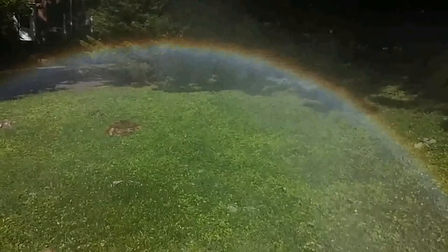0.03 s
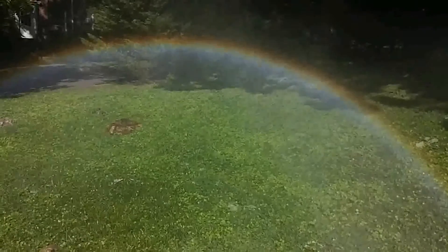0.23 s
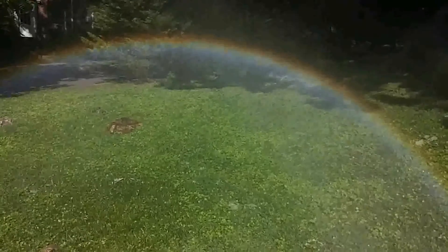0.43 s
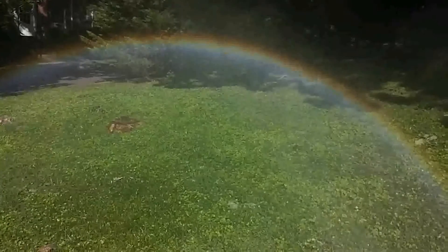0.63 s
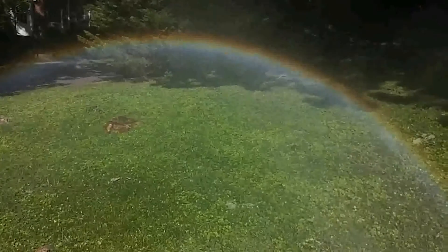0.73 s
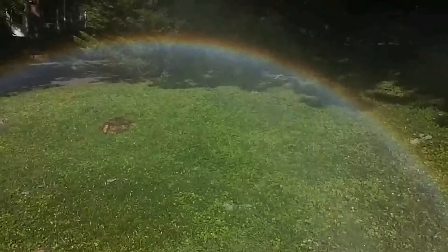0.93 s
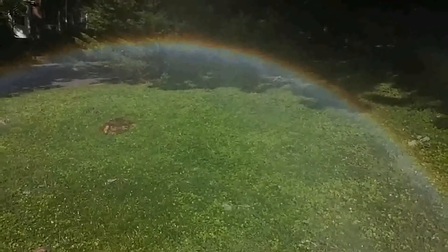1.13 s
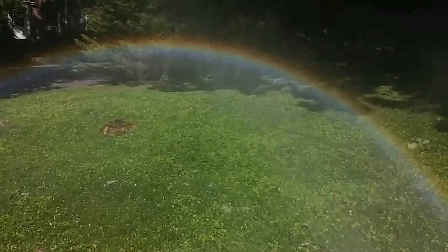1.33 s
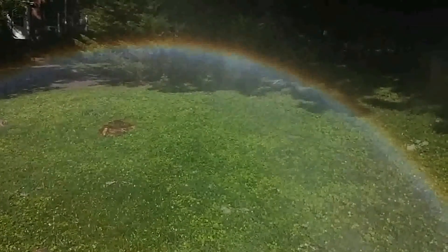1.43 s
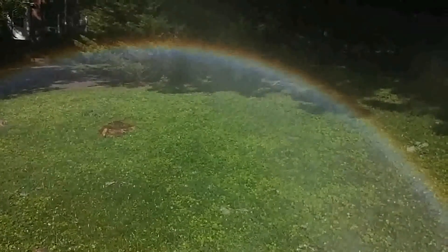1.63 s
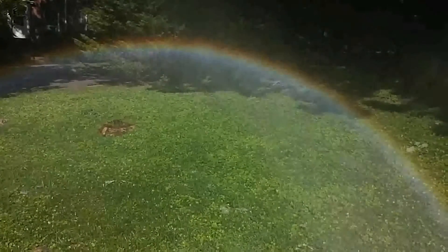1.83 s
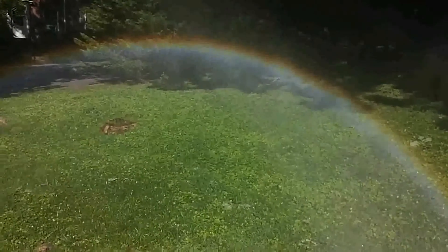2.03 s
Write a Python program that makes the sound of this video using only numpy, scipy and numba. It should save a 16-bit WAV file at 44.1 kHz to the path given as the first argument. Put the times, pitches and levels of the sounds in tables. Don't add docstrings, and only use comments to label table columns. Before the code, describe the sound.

Continuous close spray from a garden sprinkler, airy and bright, with a wavering mid-high gurgle, soft patter and tiny bubbles on turf. Faint distant traffic and yard air; phone stereo, left duller than right.

```python
import sys
import numpy as np
from scipy import signal
from scipy.fft import rfft, irfft
from scipy.io import wavfile
from scipy.ndimage import uniform_filter1d, map_coordinates
from numba import njit

SR = 44100
rng = np.random.default_rng(int(sys.argv[2]) if len(sys.argv) > 2 else 0)


def gain_from_decibels(decibels):
    exponent = np.asarray(decibels, float) / 20
    return 10 ** exponent


def unload_audio(sound):
    columns = np.transpose(np.atleast_2d(sound))
    steps = np.round(np.clip(columns, -1, 1) * 32767)
    wavfile.write(sys.argv[1], SR, steps.astype(np.int16))


N = 91860


def unit(x):
    return x / np.sqrt(np.mean(x ** 2))


def on_hz(table, hz):
    table = np.array(table)
    return np.interp(np.log(hz + 1), np.log(table[:, 0]), table[:, 1])


def on_time(table, column):
    table = np.array(table)
    return np.interp(np.arange(N) / SR, table[:, 0], table[:, column])


def bump(hz, at_hz, wide_hz):
    return 1 / (1 + (2 * (hz - at_hz) / wide_hz) ** 2)


def walk(rate):
    hold = max(int(SR / rate), 2)
    steps = np.repeat(rng.standard_normal(N // hold + 1), hold)
    smooth = uniform_filter1d(uniform_filter1d(steps, hold), hold)
    return unit(smooth[:N])


def patchy(seed, colour, swell_db, shared_db, flicker_db, flicker_rate):
    hz = np.arange(N // 2 + 1) * SR / N
    spectrum = rfft(seed) * gain_from_decibels(on_hz(colour, hz))
    place = 3 * np.log2((hz + 1) / 20)
    out, swell, group = 0, walk(10.4), walk(29.3)
    for band in range(30):
        group = unit(group + walk(26.23))
        level_db = swell_db * swell + shared_db * group + flicker_db * walk(flicker_rate)
        mask = np.cos(np.pi / 2 * np.clip(place - band, -1, 1)) ** 2
        out = out + gain_from_decibels(level_db) * irfft(spectrum * mask, N)
    return unit(out)


def drops():
    drops_per_s, spread_db, share = 5000, 1.5, .3
    hit = rng.random((2, N)) < drops_per_s / SR
    size = gain_from_decibels(spread_db * rng.exponential(size=(2, N))) * rng.standard_normal((2, N))
    bed = rng.standard_normal((2, N))
    return np.sqrt(share) * unit(hit * size) + np.sqrt(1 - share) * bed


# time in seconds, jet level in dB, splash level in dB.
WATER_FLOW = [(0.0, -37, -48), (0.05, -35.5, -44), (0.22, -36, -45), (1.31, -37.5, -43), (1.33, -36, -44.5),
              (1.45, -37.5, -39.5), (1.49, -36.5, -44), (1.64, -36, -41), (1.68, -36.5, -42),
              (1.7, -37, -37.5), (1.72, -35, -43), (1.75, -36, -40), (2.02, -37, -39.5), (2.08, -36, -39)]
# frequency in Hz, strength in dB per Hz.
JET_COLOUR = [(300, -30), (2000, -12), (4000, -3), (5000, -.5), (6500, -.5), (8000, .5), (9400, 0),
              (16000, 0)]


def jet():
    hiss = patchy(drops(), JET_COLOUR, swell_db=0.24, shared_db=0.43, flicker_db=.5, flicker_rate=15)
    return gain_from_decibels(on_time(WATER_FLOW, 1) - 1) * hiss


@njit
def plink(start, hz, size, cycles, n):
    y = np.zeros(n)
    for k in range(len(start)):
        length = int(3 * cycles * SR / hz[k])
        for i in range(min(length, n - start[k])):
            turns = i * hz[k] / SR
            swell = turns * np.exp(-3 * turns / cycles)
            y[start[k] + i] += size[k] * swell * np.sin(2 * np.pi * turns * (1 + .02 * turns / cycles))
    return y


# frequency in Hz, strength in dB per Hz.
SPLASH_COLOUR = [(300, -41), (750, -25.5), (1050, -12.5), (1900, -9), (3200, -5), (4000, -7.5), (5000, -18),
                 (8000, -43)]


def bubbles():
    bubbles_per_s, low_hz, high_hz, cycles = 900, 900, 5500, 24.
    ports = []
    for _ in range(2):
        when, pitch, size = rng.random((int(bubbles_per_s * N / SR), 3)).T
        hz = low_hz * (high_hz / low_hz) ** pitch
        loudness = gain_from_decibels(on_hz(SPLASH_COLOUR, hz) + 14.7 * size ** 3) * hz
        ports.append(plink((when * N).astype(np.int64), hz, loudness, cycles, N))
    return unit(np.array(ports))


def splash():
    patter = patchy(drops(), SPLASH_COLOUR, swell_db=.3, shared_db=.3, flicker_db=1.2, flicker_rate=50)
    return gain_from_decibels(on_time(WATER_FLOW, 2) + 1.0) * (patter + gain_from_decibels(-4) * bubbles())


@njit
def moving_band(x, hz, width):
    y, band, low = np.empty(len(x)), 0., 0.
    for i in range(len(x)):
        g, damping = np.tan(np.pi * hz[i] / SR), width / hz[i]
        v = (band + g * (x[i] - low)) / (1 + g * (g + damping))
        band, low, y[i] = 2 * v - band, low + 2 * g * v, damping * v
    return y


# time in seconds, level in dB, pitch in Hz.
THROAT_RING = [(0.0, -42, 2470), (0.03, -40.5, 2500), (0.11, -41.5, 2210), (0.23, -39, 2480),
               (0.4, -43.5, 2370), (0.45, -39.5, 2100), (0.54, -43, 2390), (0.56, -36.5, 2470),
               (0.62, -40, 2390), (0.83, -45.5, 2370), (0.94, -41, 2450), (1.36, -45.5, 2400),
               (1.39, -38, 2400), (1.47, -41, 2490), (1.85, -39.5, 2340), (1.96, -41, 2380),
               (1.98, -36.5, 2440), (2.08, -40.5, 2440)]


def throat():
    width_hz = 1.5 * 290
    hz = on_time(THROAT_RING, 2) * (1 + 0.012 * walk(39.9))
    gulps = gain_from_decibels(.6 * walk(60))
    ports = []
    for _ in range(2):
        flow = gulps * rng.standard_normal(N)
        ports.append(moving_band(moving_band(flow, hz, width_hz), hz, width_hz))
    return gain_from_decibels(on_time(THROAT_RING, 1) + 0.1) * unit(np.array(ports))


# time in seconds, rumble level in dB.
TRAFFIC_LEVEL = [(0.0, -51.5), (0.06, -58.5), (0.08, -46.5), (0.35, -59), (0.38, -47), (0.47, -59),
                 (0.49, -52.5), (1.02, -56), (1.12, -58), (1.19, -51.5), (1.37, -55.5), (1.41, -52),
                 (1.44, -62.5), (1.86, -48), (1.96, -56), (1.99, -43), (2.03, -58), (2.08, -50)]
# frequency in Hz, strength in dB per Hz.
RUMBLE_COLOUR = [(20, -30), (35, -10), (58, 0), (110, -3.5), (170, -14), (250, -21), (400, -53), (800, -52)]


def traffic():
    noise = rng.standard_normal((2, N))
    rumble = patchy(noise, RUMBLE_COLOUR, swell_db=0.5, shared_db=0.44, flicker_db=1.0, flicker_rate=24)
    return gain_from_decibels(on_time(TRAFFIC_LEVEL, 1)) * rumble


# frequency in Hz, strength in dB per Hz.
AIR_COLOUR = [(80, -40), (160, 1.5), (250, -3.5), (450, -1), (700, -5), (1100, -1), (2000, -25)]
# time in seconds, change of level in dB.
AIR_LULLS = [(.15, -4.5), (.34, -2), (.47, -11), (.515, -9), (1.05, -5), (1.28, 0), (1.465, -11),
             (1.531, -12), (1.75, -11), (1.84, -11), (2.07, -3)]


def air():
    t = np.arange(N) / SR
    lull_s = 0.011
    lull_db = sum(depth_db * np.exp(-((t - at) / lull_s) ** 2) for at, depth_db in AIR_LULLS)
    noise = rng.standard_normal((2, N))
    wash = patchy(noise, AIR_COLOUR, swell_db=.5, shared_db=0.36, flicker_db=2.5, flicker_rate=17)
    return gain_from_decibels(-55 + lull_db) * wash


# time of the peak in seconds, peak level in dB, pitch in Hz.
THROAT_GULPS = [(0.0428, -30, 2450), (0.168, -31, 2470), (0.3252, -31, 2400), (0.4359, -31, 2090),
                (0.4683, -31, 2100), (0.5526, -25, 2410), (0.6464, -31, 2370), (0.6719, -31, 2380),
                (0.7332, -34, 2540), (0.9258, -30, 2500), (0.9717, -30, 2460), (1.0266, -28, 2400),
                (1.1618, -33, 2570), (1.3887, -30, 2440), (1.4197, -29, 2470), (1.4905, -33, 2590),
                (1.5204, -31, 2590), (1.6307, -29, 2450), (1.6556, -29, 2500), (1.6766, -28, 2490),
                (1.7534, -30, 2340), (1.7754, -29, 2370), (1.8452, -32, 2270), (1.8657, -29, 2450),
                (1.8816, -25, 2370), (1.925, -30, 2380), (1.945, -28, 2250), (1.9814, -25, 2540),
                (2.0213, -26, 2450), (2.0448, -30, 2430)]
# peak time in seconds, peak level in dB, pitch in Hz.
HIGH_GULPS = [(0.5482, -40, 3250), (1.04, -31, 3380), (1.3987, -35, 3340), (1.4162, -29, 3270),
              (1.5874, -35, 3500), (1.6959, -31, 3140), (1.7779, -27, 3320), (1.8305, -28.5, 3380),
              (1.8916, -35, 3380), (1.9599, -38, 3250), (2.0467, -36.5, 3570)]


def gulp_rings():
    t = np.arange(N) / SR
    rise_s = .003
    out = np.zeros(N)
    for at, peak_db, hz in [*THROAT_GULPS, *HIGH_GULPS]:
        age = np.clip((t - at) / rise_s + 1, 0, 50)
        tone = np.sin(2 * np.pi * (hz * t + rng.random()))
        out += gain_from_decibels(peak_db - 3.5) * age * np.exp(1 - age) * tone
    return np.array([out, 0 * out])


def port(tilt, bumps, hz):
    db = on_hz(tilt, hz) + sum(gain_db * bump(hz, at_hz, wide_hz) for at_hz, wide_hz, gain_db in bumps)
    cepstrum = irfft(np.log(gain_from_decibels(db)), N)
    folded = np.r_[cepstrum[0], 2 * cepstrum[1:N // 2], np.zeros(N - N // 2)]
    return np.exp(rfft(folded))


# frequency in Hz, gain in dB.
LEFT_TONE = [(100, 0), (9400, 0), (9800, -4), (10500, -6.5), (11000, -10), (11450, -13), (11700, -16),
             (16000, -18)]
# frequency in Hz, width in Hz, gain in dB.
LEFT_REFLECTIONS = [(450, 80, 4), (1000, 100, 3), (1620, 200, 3), (3270, 200, 2.5), (6950, 250, -2),
                    (9000, 3500, 1.5)]
# frequency in Hz, lag in radians.
LEFT_EXTRA_LAG = [(1500, 0), (2000, -.5), (3400, .2), (4000, 2.2), (4500, 3.8), (5700, 4.7), (7500, 5.7),
                  (11000, 6.7)]
# time in seconds, spray level in dB (not used), treble shading in dB.
HAND_SHADE = [(0.0, -42, -7), (0.17, -35, -10), (0.46, -37, -4), (0.53, -36, -11), (1.03, -41, -7),
              (1.15, -41, -11), (1.28, -38, -10), (1.45, -41, -4.5), (1.77, -39, -5.0), (1.92, -38, -2),
              (1.96, -39, -5.5), (2.08, -38, -4.5)]
# time in seconds, extra left lag in microseconds.
PHONE_TURN = [(0, 16), (.2, 14), (.45, 6), (.8, 2), (1.05, -5), (1.3, 0), (1.7, -4), (2.08, -2)]


def left_port(near, hz):
    late_s, shade_from_hz, shade_ref_db = .00025, 6300, -4
    lag = 2 * np.pi * hz * late_s + on_hz(LEFT_EXTRA_LAG, hz)
    left = near * port(LEFT_TONE, LEFT_REFLECTIONS, hz) * np.exp(-1j * lag)
    treble = irfft(left / (1 + (shade_from_hz / (hz + 1)) ** 8), N)
    left = irfft(left, N) + (gain_from_decibels(on_time(HAND_SHADE, 2) - shade_ref_db) - 1) * treble
    heard_at = np.arange(N) - on_time(PHONE_TURN, 1) * SR / 10 ** 6
    return map_coordinates(left, [heard_at], order=5, mode="mirror")


# frequency in Hz, gain in dB.
RIGHT_TONE = [(100, -3.3), (450, -4), (1000, -12), (2400, -8), (3700, -1.5), (6500, -.5), (7600, 3),
              (16000, 3)]
# frequency in Hz, width in Hz, gain in dB.
RIGHT_REFLECTIONS = [(450, 80, 4), (820, 60, 5), (1780, 350, -9), (3100, 400, -12), (4530, 280, -26),
                     (5480, 250, -4), (7350, 400, 4.5), (9000, 700, 5.5), (10400, 700, -3),
                     (13200, 300, -3), (14700, 200, -2), (15000, 500, 2), (15500, 350, -6)]
# frequency in Hz, share of the amplitude.
SHARED_SOUND = [(60, .9), (600, .76), (1600, .82), (2450, .88), (3600, .68), (5850, .8), (7400, .84),
                (9200, .8)]
# frequency in Hz, width in Hz, share lost.
CANCELLED = [(1300, 300, .4), (1900, 350, .5), (3100, 350, .65), (4600, 700, .8), (5450, 250, .5),
             (6500, 600, .4), (8200, 500, .3), (11000, 2500, .5)]


def right_port(near, around, hz):
    kept = [1 - lost * bump(hz, at_hz, wide_hz) for at_hz, wide_hz, lost in CANCELLED]
    alike = on_hz(SHARED_SOUND, hz) * np.prod(kept, axis=0)
    mixed = alike * near + np.sqrt(1 - alike ** 2) * around
    return irfft(mixed * port(RIGHT_TONE, RIGHT_REFLECTIONS, hz), N)


def scene():
    hz = np.arange(N // 2 + 1) * SR / N
    near, around = rfft(jet() + splash() + throat() + gulp_rings() + traffic() + air())
    return gain_from_decibels(4.5) * np.array([left_port(near, hz), right_port(near, around, hz)])


# frequency in Hz, limit in dB against that port's mean.
MUTE_LIMIT = [(300, -34), (1500, -21), (3000, -15), (4500, -14), (5600, -9), (7000, -11), (11000, -15),
              (16000, -16)]


def mute_weak(x):
    pad = 832
    frame = dict(fs=SR, window="cosine", nperseg=2048, noverlap=1024)
    hz, _, spec = signal.stft(np.pad(x, ((0, 0), (pad, 0))), **frame)
    power = np.abs(spec[:, :1024]) ** 2
    bands = power.reshape(2, 128, 8, -1).mean(axis=2)
    waver_db = 2.5 * rng.standard_normal((2, 1, bands.shape[2]))
    limit_db = on_hz(MUTE_LIMIT, hz[4:1024:8])[:, None] + waver_db
    limit = power.mean(axis=(1, 2), keepdims=True) * gain_from_decibels(limit_db) ** 2
    spec[:, :1024] *= np.repeat(bands > limit, 8, axis=1)
    return signal.istft(spec, **frame)[1][:, pad:pad + N]


def band_limit(x):
    return signal.sosfilt(signal.butter(12, 16610, fs=SR, output="sos"), x)


def record(dry):
    top_cut = signal.ellip(16, .3, 90, 15740, fs=SR, output="sos")
    mix = mute_weak(signal.sosfilt(top_cut, dry))
    return band_limit(mix)


dry = scene()
out = record(dry)
unload_audio(out)
```